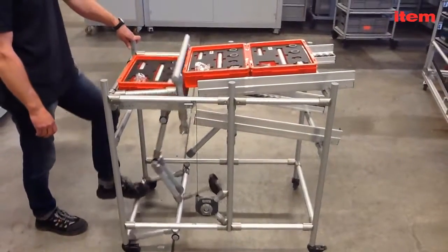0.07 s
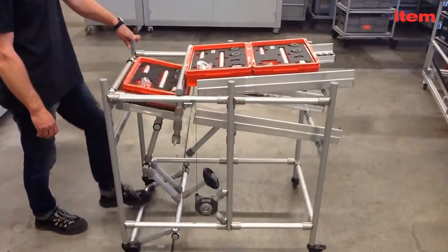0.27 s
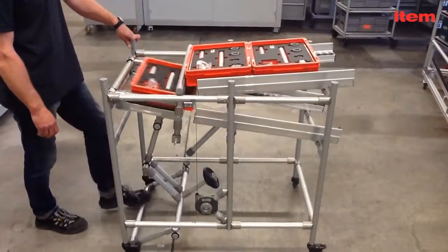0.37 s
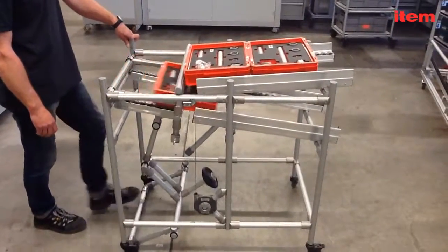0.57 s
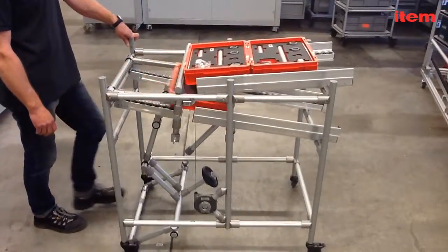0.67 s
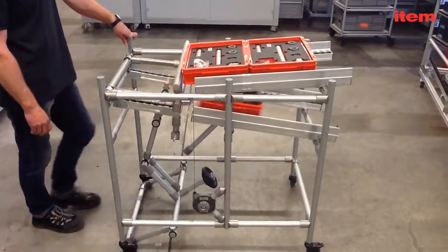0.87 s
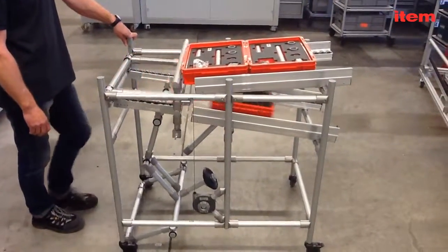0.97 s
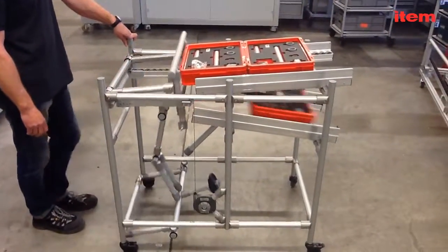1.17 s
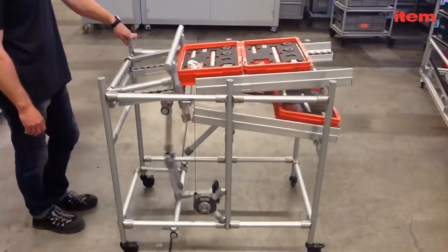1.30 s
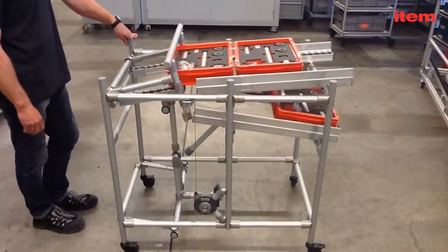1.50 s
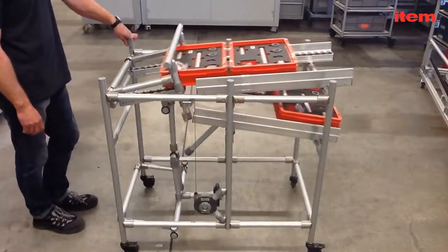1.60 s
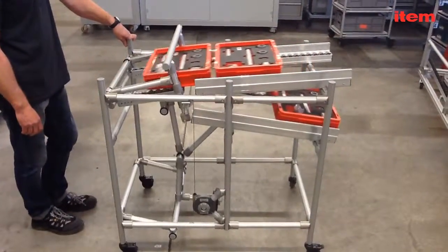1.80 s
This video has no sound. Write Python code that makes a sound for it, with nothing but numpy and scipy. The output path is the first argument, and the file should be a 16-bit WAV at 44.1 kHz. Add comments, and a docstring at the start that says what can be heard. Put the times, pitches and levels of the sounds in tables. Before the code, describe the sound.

A loaded plastic bin tips, clatters down a roller track and hits the end stop.

```python
"""A dull wash fades and a pedal linkage clunks, tipping a loaded plastic bin on a cart of metal tubes.
The bin clatters off the tilted shelf, drops on a roller track, gathers speed and hits the end stop.
The rollers spin down while the next bins creep forward; the frame rings and a workshop hall answers.
Impacts and rolling are random contact clicks shaped by a spectrum; ringing parts are damped modes."""
import sys
import numpy as np
from scipy import signal
from scipy.io import wavfile
from scipy.ndimage import uniform_filter1d

SR = 44100
rng = np.random.default_rng(int(sys.argv[2]) if len(sys.argv) > 2 else 0)


def put_to_file(sound):
    """Save the sound as 16-bit audio at rate SR, in the file named by the first command-line argument."""
    columns = np.atleast_2d(sound).T  # one column per channel
    safe = np.clip(columns, -1, 1)
    whole_steps = np.round(safe * 32767)
    wavfile.write(sys.argv[1], SR, whole_steps.astype(np.int16))


N = 81585
STOP_S, KNOCK_RISE_S = 1.3848, .003

# Spectrum of a knock: (frequency [Hz], relative density [dB])
KNOCK_SPECTRUM = [(30, -42), (80, -35), (170, -9), (500, -8), (900, -3), (1800, 0), (3000, 1), (4300, -3),
                  (5500, -13), (7800, -21), (9600, -13), (12500, -20)]


def landing():
    """Impact excitation: the bin drops on the track, its load chatters and its floor rings."""
    # (frequency [Hz], relative density [dB])
    spectrum = [(30, -30), (100, -27), (200, -7), (560, 3), (1200, -5), (1750, 1), (2300, -1), (3750, 4),
                (5000, -11), (7700, -18), (10000, -6), (12500, -16)]
    # (frequency [Hz], level [dB], T60 [s])
    floor_modes = [(370, -22, .12), (520, -23, .09), (885, -20, .1), (3820, -24, .07)]
    return impact(.8195, spectrum, floor_modes, db=-14.5, rise_s=.01, decay_s=.008)


def end_stop():
    """Sudden deceleration: the stop halts the bin, its load chatters and its wall rings."""
    # (frequency [Hz], relative density [dB])
    spectrum = [(30, -52), (400, -28), (700, -7), (1050, -1), (1400, -2), (2200, -3), (3600, -1),
                (4600, -11), (7700, -23), (10000, -18), (14000, -28)]
    # (frequency [Hz], level [dB], T60 [s])
    wall_modes = [(900, -19, .04), (1000, -15, .05), (1150, -13, .055), (1615, -19, .05),
                  (2700, -14.5, .055), (3535, -18, .05)]
    return impact(STOP_S, spectrum, wall_modes, db=-10.2, rise_s=.004, decay_s=.006)


def knocks():
    """Brief contacts radiate broadband sound: the linkage clunks, the bins and their load clatter."""
    # (time [s], level [dB], decay [s], bass shelf [dB], treble shelf [dB])
    blows = [(0.233, -20, .005, 8, -10), (0.247, -29, .014, 9, -10), (0.283, -27.5, .007, 4, -11),
             (0.347, -24, .01, 3, 2), (0.356, -12, .012, 1, -1), (0.375, -21, .011, 2, -4),
             (0.39, -17.5, .011, -1, 2), (0.404, -14.5, .006, 4, -7), (0.415, -19.5, .009, 10, -2),
             (0.442, -26, .014, 6, -7), (0.595, -26, .01, 0, 6), (0.654, -25, .014, 4, -6),
             (0.706, -22, .007, 6, 5), (0.747, -20, .008, 1, 7), (0.756, -20.5, .012, 5, 5),
             (0.801, -23, .011, 5, 0), (0.85, -27, .01, 3, 6), (0.87, -26, .018, 2, 3),
             (1.512, -31, .016, -6, -6), (1.685, -33, .012, -6, -8)]
    out = np.zeros(N)
    for s, db, decay_s, bass_db, treble_db in blows:
        add(out, s, colour(chatter(db, KNOCK_RISE_S, decay_s), KNOCK_SPECTRUM, bass_db, treble_db))
    return out


def rollers():
    """Rolling noise: wheels rattle on their axles, brighter with speed, and the moving bin rumbles."""
    # (time [s], rattle level [dB], rumble level [dB], rattle treble gain [dB])
    envelopes = [(0.22, -49, -55, -8), (0.27, -36, -40, -5), (0.34, -37, -42, -6), (0.43, -27.5, -41, -1),
                 (0.56, -32.5, -44, -4), (0.72, -31, -39.5, -2), (0.9, -26, -37.5, 0),
                 (0.97, -28.5, -41, -1), (1.22, -23.7, -42, -1), (1.38, -23.5, -42, 0),
                 (1.48, -28, -47, -2), (1.65, -32.5, -54, -8), (1.72, -31, -55, -7),
                 (1.85, -38.5, -59, -17)]
    # Both: (frequency [Hz], relative density [dB])
    rattle_spectrum = [(100, -50), (400, -20), (720, -9), (1020, 1), (1350, -3), (1680, 0), (2100, -3),
                       (2800, 1.5), (3850, -1.5), (5000, -11), (7600, -25), (10000, -21), (13500, -31)]
    rumble_spectrum = [(25, -46), (70, -38), (110, -15), (200, -3), (350, 0), (460, -4), (650, -1),
                       (1300, -20), (5000, -60)]
    ticks_per_s, tick_decay_s, treble_hz = 45, .003, 2900
    t = np.arange(N) / SR
    times, *levels = np.transpose(envelopes)
    rattle_gain, rumble_gain, treble_gain = (amp(np.interp(t, times, db)) for db in levels)
    impulses = rng.random(N) * (rng.random(N) < ticks_per_s / SR)
    ticks = signal.lfilter([1], [1, -np.exp(-1 / (tick_decay_s * SR))], impulses)
    clicks = unit(contacts(N) * (1 + amp(-1) * ticks))  # each tick briefly lifts the rattle
    rattle = colour(clicks * rattle_gain, rattle_spectrum)
    low = signal.sosfiltfilt(signal.butter(2, treble_hz, fs=SR, output="sos"), rattle)
    rumble = colour(contacts(N) * rumble_gain, rumble_spectrum)
    return low + (rattle - low) * treble_gain + rumble


def roller_hits():
    """Uniform acceleration: the bin strikes evenly spaced rollers ever faster, ringing the track."""
    # One tick per roller: (level [dB])
    tick_levels = [-31, -30, -25, -37, -31, -31, -25.5, -30, -31, -31, -25, -31]
    # (frequency [Hz], level at the starting speed [dB], T60 in common below)
    track_modes = [(1690, -31), (2780, -30), (3870, -34)]
    t60_s, detune = .12, .03
    first_s, start_per_s, acceleration_per_s2 = .9755, 24, 26
    out = np.zeros(N)
    for k, db in enumerate(tick_levels):
        rate = np.sqrt(start_per_s ** 2 + 2 * acceleration_per_s2 * k)
        s = first_s + 2 * k / (start_per_s + rate)
        tick = colour(chatter(db, KNOCK_RISE_S, decay_s=.005), KNOCK_SPECTRUM, treble_db=3.5)
        modes = [(hz * (1 + detune * rng.uniform(-1, 1)), level, t60_s) for hz, level in track_modes]
        add(out, s, tick + ring(modes) * rate / start_per_s)
    return out


def clinks():
    """Free vibration: each knocked metal part rings in a single mode."""
    # (time [s], frequency [Hz], level [dB], T60 [s])
    strikes = [(0.235, 1780, -23, .07), (0.236, 328, -37, .3), (0.358, 4500, -22, .06),
               (0.39, 2850, -18, .08), (0.402, 3160, -15, .065), (0.707, 4430, -26, .04),
               (1.129, 1680, -23, .1), (1.441, 1140, -23, .05)]
    out = np.zeros(N)
    for s, *mode in strikes:
        add(out, s, ring([mode]))
    return out


def frame(shaking, t60_s=.25):
    """Forced vibration: the tube frame resonates where the shaking meets its modes."""
    # (frequency [Hz], relative gain [dB])
    tube_modes = [(325, 3), (378, 8), (878, 5), (1015, 3), (1131, 4.5), (1610, 3), (2042, -1), (2900, 0),
                  (3333, 2), (3820, 4)]
    t = np.arange(SR // 2) / SR
    fade = np.exp(-np.log(1000) * t / t60_s)
    tones = sum(amp(db) * np.cos(2 * np.pi * hz * t) for hz, db in tube_modes)
    response = 2 * fade / fade.sum() * tones
    return amp(-10) * signal.fftconvolve(shaking, response)[:N]


def whirr(centre_hz=1120, width_hz=150, decay_s=1.1):
    """Narrow-band resonance: after the stop the track keeps up a hollow, fading whirr."""
    out, t = np.zeros(N), np.arange(N) / SR
    band = signal.lfilter(*signal.iirpeak(centre_hz, centre_hz / width_hz, SR), contacts(N))
    add(out, STOP_S, amp(-40) * unit(band) * np.exp(-t / decay_s))
    return out


def wash(decay_s=.11):
    """Exponential decay: a dull noise dies away at the start."""
    # (frequency [Hz], relative density [dB])
    spectrum = [(50, -35), (300, -10), (750, 2), (2500, -3), (4000, -19), (8000, -33)]
    t = np.arange(N) / SR
    return amp(-36.5) * colour(rng.standard_normal(N), spectrum) * np.exp(-t / decay_s)


def hall(x, echo_decay_s=.012, tail_delay_s=.014):
    """Reverberation: early reflections off floor and cart, then a diffuse tail whose treble dies first."""
    # (frequency [Hz], T60 [s])
    decay_times = [(100, .7), (500, .8), (2500, .9), (5000, .7), (10000, .4), (16000, .28)]
    t = np.arange(SR) / SR
    hz, times, spectra = signal.stft(rng.standard_normal(SR), SR, nperseg=256)
    fade = np.exp(-np.log(1000) * times / read(decay_times, hz)[:, None])
    tail = signal.istft(spectra * fade, SR)[1][:SR] * (t > tail_delay_s)
    echoes = rng.standard_normal(SR) * np.exp(-t / echo_decay_s) * (t > .004)
    response = amp(-12.5) * unit(tail) + amp(-14) * unit(echoes)
    return signal.fftconvolve(x, response)[:N] / np.sqrt(SR)


def air():
    """Stationary noise: the quiet air of the hall."""
    # (frequency [Hz], relative density [dB])
    spectrum = [(25, -34), (70, -26), (110, 1), (300, -3), (700, 2), (1900, -2), (3200, -17), (7000, -24),
                (15500, -35)]
    return amp(-50.5) * colour(rng.standard_normal(N), spectrum)


def impact(s, spectrum, modes, db, rise_s, decay_s):
    """A heavy blow at time s is the sum of contact noise and the modes of one panel."""
    out = np.zeros(N)
    noise = colour(chatter(db, rise_s, decay_s, hold_s=.006), spectrum)
    add(out, s, noise + ring(modes, rise_s))
    return out


def chatter(db, rise_s, decay_s, hold_s=0):
    """Repeated collisions of loose parts make a flurry that swells and decays exponentially."""
    t = np.arange(SR // 4) / SR
    clicks = contacts(len(t), spread_db=1.2)
    clicks /= np.sqrt(abs(uniform_filter1d(clicks ** 2, size=80)) + 1e-3)  # even out short-term power
    envelope = np.minimum(t / rise_s, 1) * np.exp(-np.maximum(t - rise_s - hold_s, 0) / decay_s)
    return amp(db) * clicks * envelope


def ring(modes, rise_s=KNOCK_RISE_S):
    """Damped modes (frequency [Hz], level [dB], T60 [s]) swell during a knock, then decay freely."""
    t = np.arange(SR // 4) / SR
    free_s = np.maximum(t - rise_s, 0)
    tones = sum(amp(db - 60 * free_s / t60) * np.sin(2 * np.pi * (hz * t + rng.random()))
                for hz, db, t60 in modes)
    return tones * np.minimum(t / rise_s, 1) ** 2


def contacts(n, spread_db=2.6, per_s=8000):
    """Shot noise: dense random clicks of uneven size."""
    size = amp(spread_db * np.minimum(rng.exponential(1, n), 4))
    return unit(size * rng.choice([-1, 1], n) * (rng.random(n) < per_s / SR))


def colour(x, spectrum, bass_db=0, treble_db=0, bass_hz=450, treble_hz=6000, size=4096):
    """Minimum-phase filter: a spectrum scaled to unit energy, then bass and treble shelves."""
    hz = abs(np.fft.fftfreq(size, 1 / SR))
    bass = bass_db / (1 + (hz / bass_hz) ** 4)
    treble = treble_db * (1 - 1 / (1 + (hz / treble_hz) ** 4))
    log_gain = np.log(unit(amp(read(spectrum, hz))) * amp(bass + treble))
    taps = np.fft.ifft(np.exp(np.conj(signal.hilbert(log_gain)))).real
    return signal.fftconvolve(x, taps[:size // 2])[:len(x)]


def amp(db):
    """Decibels to amplitude ratio."""
    return 10 ** (np.asarray(db) / 20)


def unit(x):
    """Normalises to an rms of one."""
    return x / np.sqrt(np.mean(x ** 2) + 1e-20)


def read(points, hz):
    """Interpolates a table on a log-frequency axis."""
    f, value = np.transpose(points)
    return np.interp(np.log(hz + 1), np.log(f), value)


def add(mix, s, sound):
    """Superposes a sound at time s."""
    part = mix[max(round(s * SR), 0):][:len(sound)]
    part += sound[:len(part)]


def scene():
    """Superposition: the cart's direct sound, its reverberation and the air."""
    shaking = knocks() + rollers() + roller_hits()
    cart = shaking + frame(shaking) + clinks() + whirr() + wash() + landing() + end_stop()
    return (cart + hall(cart) + air())[None]


def record(dry):
    """Soft saturation rounds the loudest peaks; a low-pass filter limits the band."""
    rounded = 1.4 * np.tanh(amp(.7) * dry / 1.4)
    low_pass = signal.firwin(511, cutoff=15600, window=("kaiser", 10), fs=SR)
    return signal.oaconvolve(rounded, low_pass[None], "same")


dry = scene()
out = record(dry)
put_to_file(out)
```